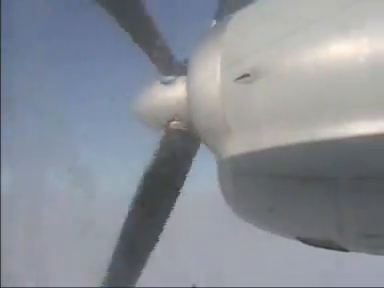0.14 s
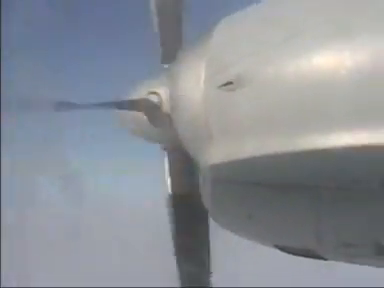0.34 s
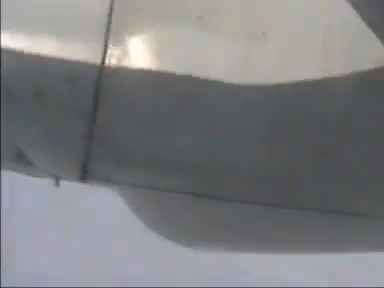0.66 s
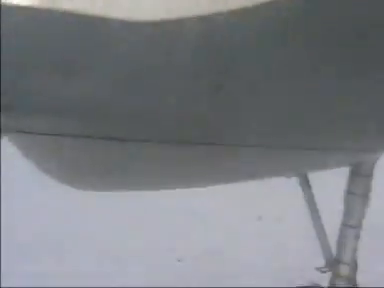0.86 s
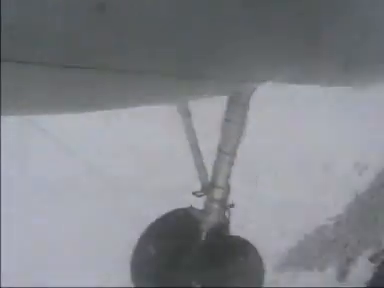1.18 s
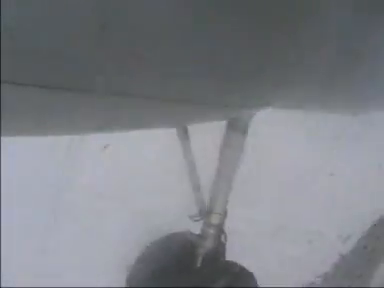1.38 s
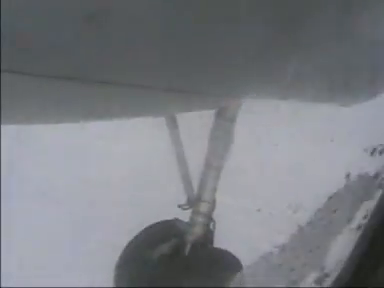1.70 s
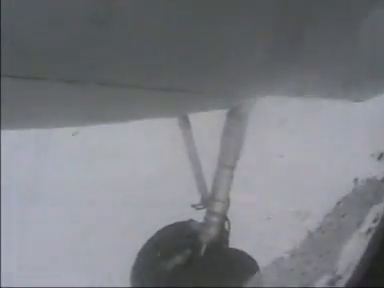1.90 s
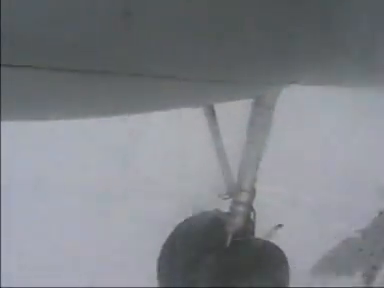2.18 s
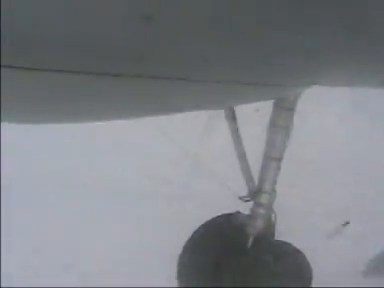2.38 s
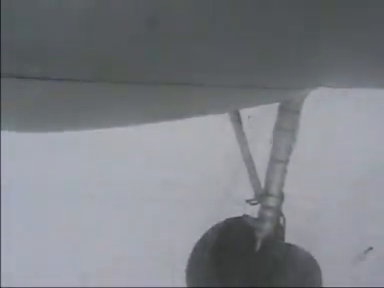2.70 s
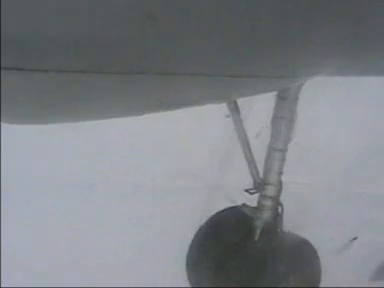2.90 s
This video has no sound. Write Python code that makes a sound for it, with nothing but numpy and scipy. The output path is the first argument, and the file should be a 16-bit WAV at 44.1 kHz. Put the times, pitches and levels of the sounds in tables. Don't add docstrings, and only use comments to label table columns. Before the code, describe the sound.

Propeller airliner drone: deep steady throbbing hum with rushing air, heard inside the cabin

```python
import sys
import numpy as np
from scipy import signal
from scipy.io import wavfile
from scipy.ndimage import uniform_filter1d

SR = 44100
rng = np.random.default_rng(int(sys.argv[2]) if len(sys.argv) > 2 else 0)


def boost(x):
    u = np.asarray(x, float) / 20
    return 10 ** u


def int16_out(signal):
    q = np.round(np.clip(np.atleast_2d(signal).T, -1, 1) * 32767)
    wavfile.write(sys.argv[1], SR, q.astype(np.int16))


N = 134505
TIME_S = np.arange(N) / SR
MIC_TOP = .0145


def rms_one(x):
    return x / np.sqrt(np.mean(x ** 2) + 1e-20)


def drift(rate_hz):
    r = np.exp(-80 * np.pi * rate_hz / SR)
    slow = signal.lfilter([1], [1, -2 * r, r * r], rng.standard_normal(N // 40 + 3002))[3000:]
    return np.interp(np.arange(N) / 40, np.arange(len(slow)), rms_one(slow - slow.mean()))


def resonance(x, hz, width_hz):
    r = np.exp(-np.pi * width_hz / SR)
    poles = [1, -2 * r * np.cos(2 * np.pi * hz / SR), r * r]
    return signal.lfilter([(1 - r * r) / 2, 0, (r * r - 1) / 2], poles, x)


def resonant_noise(hz, width_hz):
    once = resonance(rng.standard_normal(N), hz, width_hz)
    return rms_one(resonance(once, hz, width_hz))


def highpass(x, hz):
    return signal.sosfiltfilt(signal.butter(1, hz, "high", fs=SR, output="sos"), x)


# order, level/dB, polarity
BLADE_MULTIPLES = [(1, 2.2, 1), (2, -.3, 1), (3, -5.2, 1), (4, -20, -1), (5, -29, -1), (6, -24, -1)]


def blades(level_db, near_db):
    blade_hz, speed_up_hz_per_s, first_pass_s = 86.32, .052, .0101
    lean_rad, wander_rad, flutter_db = .5, .04, .25
    t = TIME_S - first_pass_s
    turn_rad = 2 * np.pi * (blade_hz + speed_up_hz_per_s * t / 2) * t
    phase_rad = turn_rad + wander_rad * drift(0.15)
    out = 0
    for k, db, polarity in BLADE_MULTIPLES:
        order_db = level_db + db + k * flutter_db * drift(1.45)
        if k > 2:
            order_db = order_db + .7 * near_db
        out = out + polarity * np.sqrt(2) * boost(order_db) * np.cos(k * phase_rad + lean_rad)
    return out


def banded_noise(spectrum, shared_db, own_db, rate_hz, swing_db, bright_follows):
    hz_points, db_points = np.transpose(spectrum)
    edges_hz = 22 * 2 ** np.arange(0, 9.5, 1 / 3)
    together_db = shared_db * drift(rate_hz)
    white = rng.standard_normal((2, N + SR // 2))
    out = 0
    for k, (low, high) in enumerate(zip(edges_hz, edges_hz[1:])):
        hz = np.sqrt(low * high)
        if hz <= hz_points[0] * .8:
            continue
        sos = signal.butter(2, [low, high], "band", fs=SR, output="sos")
        band = signal.sosfilt(sos, white[k % 2])[-N:]
        band_db = np.interp(np.log(hz), np.log(hz_points), db_points)
        band_db -= 12 * max(0, np.log2(hz / hz_points[-1]))
        follows = bright_follows if hz > 850 else 1
        flicker_db = together_db + own_db * drift(rate_hz)
        out = out + band * boost(band_db + flicker_db + (follows - 1) * swing_db)
    return rms_one(out) * boost(swing_db)


# f/Hz, density/(dB per Hz)
ROAR_SPECTRUM = [(28, -11.5), (58, -28), (80, -7.5), (250, 0.5), (350, -2.5), (620, -6), (900, -13),
                 (2200, -28.5)]


def wall_roar(level_db, passes):
    mean_db = level_db.mean()
    roar = banded_noise(ROAR_SPECTRUM, 0.52, 0.23, 15.0, level_db - mean_db, bright_follows=0.16)
    pulse_db = 4 * np.clip(passes / MIC_TOP, 0, 1) ** 2
    return boost(3.5 + mean_db) * roar * boost(pulse_db)


# f/Hz, density/(dB per Hz)
HISS_SPECTRUM = [(1000, 4), (2000, -5), (3200, -3), (4300, -1.5), (6000, -6), (8000, -8), (10000, -15),
                 (13000, -17.5)]


def vent_hiss(level_db):
    gust_db, gust_rate_hz = .45, 6
    mean_db = level_db.mean()
    hiss = banded_noise(HISS_SPECTRUM, 0.88, 0.33, 53.0, level_db - mean_db, bright_follows=1)
    return boost(1.5 + mean_db) * hiss * boost(gust_db * drift(gust_rate_hz))


# f/Hz, width/Hz, level/dB rms
WHINE_LINES = [(4425, 45, -85), (4500, 40, -85), (4565, 40, -85), (4670, 100, -85.5), (5141, 120, -90),
               (7410, 200, -90), (3608, 40, -94)]
# t/s, level/dB
GEAR_TURN = [
    (0, -2),
    (.85, -2),
    (1, 2),
    (1.5, 1.5),
    (1.65, 5),
    (2.25, 4.5),
    (2.5, 0),
    (3.05, -2.5),
]


def whines():
    gear_db = -86 + np.interp(TIME_S, *np.transpose(GEAR_TURN))
    out = 0
    for hz, width_hz, db in [*WHINE_LINES, (4979, 24, gear_db)]:
        out = out + boost(db + 2 * drift(6.5)) * resonant_noise(hz, width_hz)
    return out


# t/s, level/dB, decay/s, f/Hz
TRIM_TICKS = [(.112, -64, .003, 8000), (.115, -74, .03, 7300), (.33, -71, .003, 8000),
              (.388, -67, .003, 8500), (.445, -70, .012, 4000), (.955, -72, .02, 4500),
              (.987, -69, .02, 5000), (1.032, -65, .01, 3600), (1.048, -57, .005, 4000),
              (1.055, -60.5, .006, 4000), (1.058, -72, .012, 8000), (1.066, -61, .005, 3800),
              (1.071, -59, .003, 3600), (1.095, -68, .004, 4500), (1.115, -69, .008, 4500)]


def ticks():
    out = 0
    for s, db, decay_s, hz in TRIM_TICKS:
        age_s = np.maximum(TIME_S - s, 0)
        burst = (TIME_S > s) * np.exp(-age_s / decay_s)
        out = out + boost(db) * burst * resonant_noise(hz, .6 * hz)
    return out


# t/s, level/dB, f/Hz, t60/s
PANEL_KNOCKS = [
    (.621, -43, 280, .12),
    (.9828, -31.5, 215, .035),
    (2.4, -47, 300, .15),
]


def knocks():
    out = 0
    for s, db, hz, t60_s in PANEL_KNOCKS:
        age_s = np.maximum(TIME_S - s, 0)
        onset = 1 - np.exp(-age_s / 0.0029)
        out = out + boost(db - 60 * age_s / t60_s) * np.sin(2 * np.pi * hz * age_s) * onset
    return out


# t/s, blade level/dB, roar level/dB, hiss level/dB
MIC_SWING = [(0, -49.5, -55, -72), (.13, -49, -51, -70.5), (.3, -49, -51, -71), (.45, -49, -51.5, -70),
             (.59, -50, -55.5, -73.5), (.64, -48.5, -52, -69.5), (.85, -48.5, -54.5, -70.5),
             (.93, -47, -54, -69.3), (1.06, -47, -53, -68), (1.15, -47.5, -54, -70),
             (1.4, -47.5, -55.5, -70.5), (1.55, -48, -55, -69.7), (1.8, -47.7, -55.5, -70.5),
             (2.1, -47.5, -55.5, -70.3), (2.4, -48, -53.5, -69.5), (2.6, -48, -55, -70.5),
             (2.85, -48, -53.5, -70.5), (3.05, -49, -56, -71.5)]


def scene():
    s, *columns = np.transpose(MIC_SWING)
    blade_db, roar_db, hiss_db = [np.interp(TIME_S, s, c) for c in columns]
    passes = blades(blade_db, roar_db - roar_db.mean())
    air = wall_roar(roar_db, passes) + vent_hiss(hiss_db)
    whine = whines() * boost(hiss_db - hiss_db.mean())
    return (passes + air + whine + ticks() + knocks())[None]


def overload(x):
    knee, slow_hz, treble_spared = 2.8, 700, .62
    flattened = x / (1 + (np.maximum(x, 0) / MIC_TOP) ** knee) ** (1 / knee)
    return flattened + treble_spared * highpass(x - flattened, slow_hz)


# start t/s, end t/s
SCAN_LEAKS = [(.09, .3), (.35, .46), (.56, .94), (1.2, 1.27), (1.37, 1.44), (1.79, 2.3), (2.35, 2.64),
              (2.73, 2.8), (2.9, 3.05)]


def scan_whistle():
    spells = sum((TIME_S > start) & (TIME_S < end) for start, end in SCAN_LEAKS) * 1.
    return boost(-97) * uniform_filter1d(spells, size=900) * np.sin(2 * np.pi * 15624.5 * TIME_S)


def top_cut(x):
    return signal.sosfilt(signal.butter(12, 15670, fs=SR, output="sos"), x)


def record(dry):
    bass_cut_hz, treble_cut_hz, circuit_db = 28, 12300, -99
    x = highpass(overload(dry), bass_cut_hz)
    x = signal.sosfiltfilt(signal.butter(6, treble_cut_hz, fs=SR, output="sos"), x)
    mix = x + scan_whistle() + boost(circuit_db) * rng.standard_normal(N)
    return top_cut(mix)


dry = scene()
out = record(dry)
int16_out(out)
```